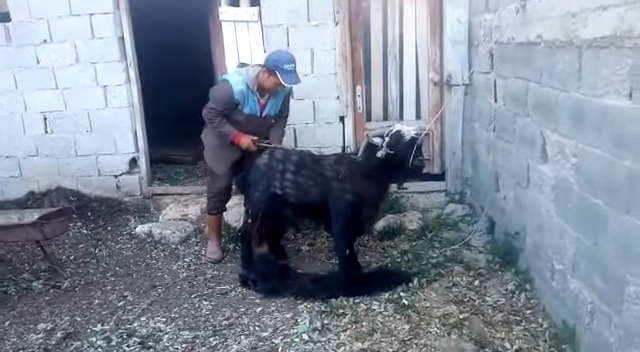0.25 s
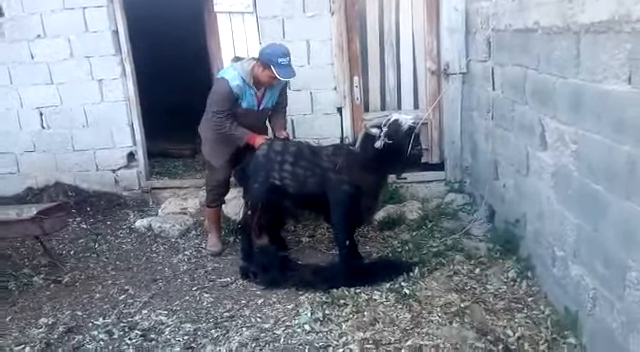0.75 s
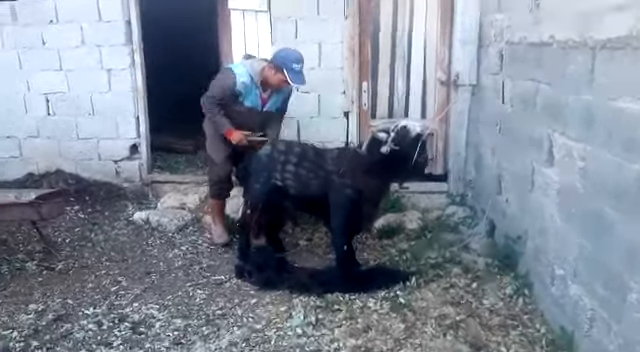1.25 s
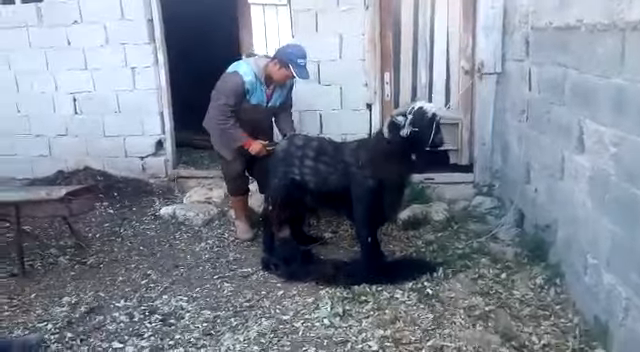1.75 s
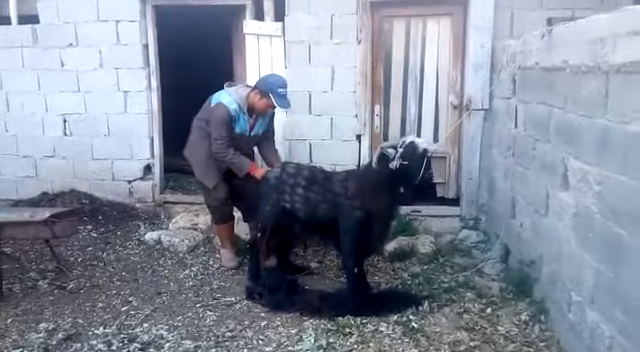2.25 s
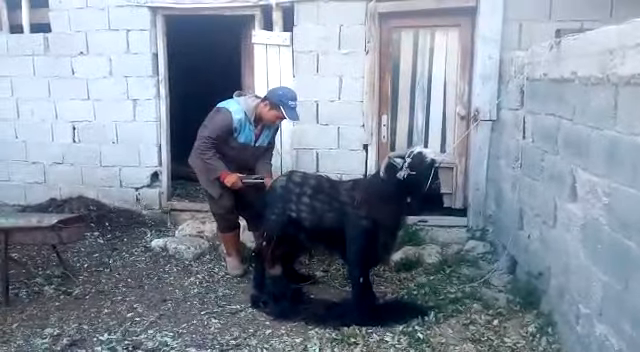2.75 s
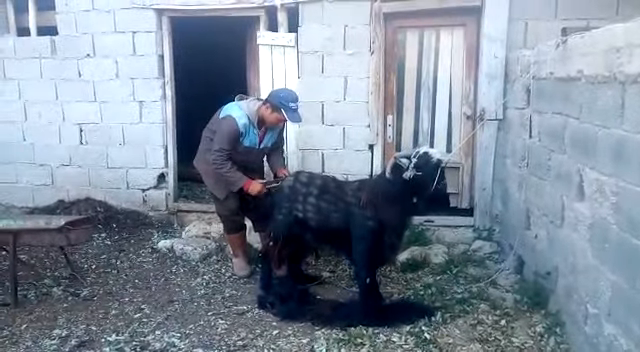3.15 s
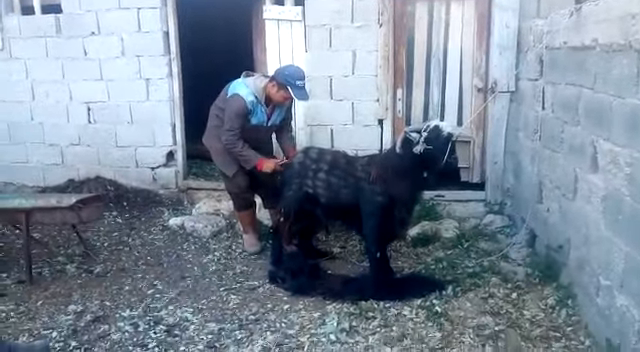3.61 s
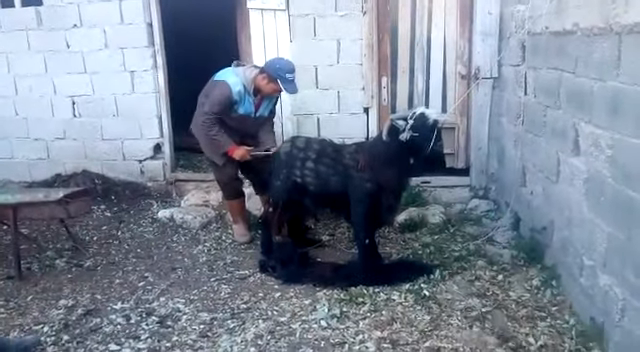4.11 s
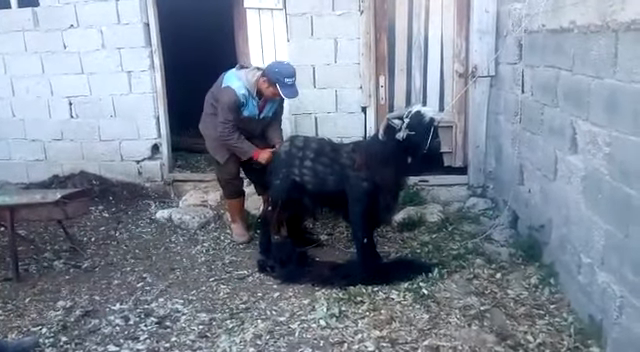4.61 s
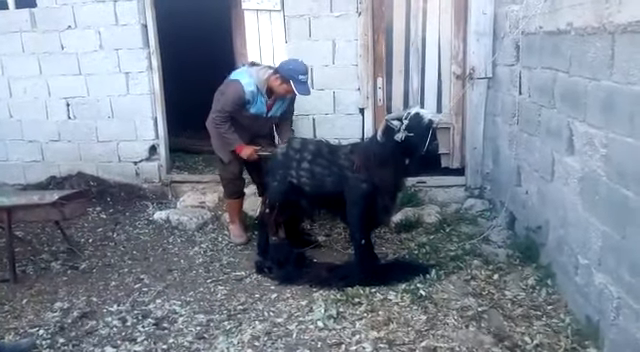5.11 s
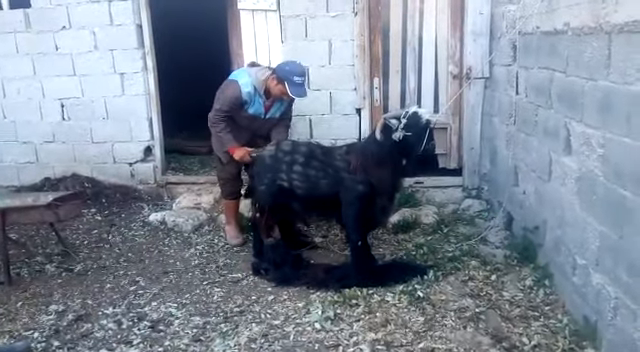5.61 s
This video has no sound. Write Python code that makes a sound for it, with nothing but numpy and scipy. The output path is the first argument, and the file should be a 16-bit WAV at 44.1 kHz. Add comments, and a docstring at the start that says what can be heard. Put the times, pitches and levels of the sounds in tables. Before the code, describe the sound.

Steel hand shears cut through a goat's long hair in four sharp snips, a little over a second apart. Each has a brief crunch, a bright metallic clack, then a soft ringing scrape as the blades spring open. Between them come faint coat rustles, a few dull hoof knocks and a soft boot scuff. The walled yard gives a short echo over a faint hum of air.

```python
"""Shearing a goat by hand

Steel shears make four snips through long hair in a quiet yard between block walls. Each time the
blades crunch through a tuft, clack against their stop, then slide open with a soft ring. The walls
send back a short echo. A hand rustles the coat, hooves and a boot shift, and the air hums faintly."""
import sys
import numpy as np
from scipy import signal
from scipy.fft import rfft, irfft, next_fast_len
from scipy.io import wavfile
from scipy.ndimage import uniform_filter1d

SR = 44100
rng = np.random.default_rng(int(sys.argv[2]) if len(sys.argv) > 2 else 0)


def materialize(psi):
    """Save the field psi as 16-bit PCM at rate SR to the path in sys.argv[1].

    A 1-D psi becomes a single channel; in a 2-D psi each row is a channel.
    """
    bounded = np.clip(np.atleast_2d(psi).T, -1, 1)
    quanta = np.round(bounded * 32767).astype(np.int16)
    wavfile.write(sys.argv[1], SR, quanta)


N = 258733
TIME = np.arange(N) / SR

# The blades hit their stop and bounce once; each snip rings louder or softer around one pitch (its band).
# start_s, level_db, band_hz, band_db, crack_tilt_db_per_octave, bounce_delay_s, bounce_db
SNIPS = [(1.0062, -14.5, 2810, 4.5, 0, 0.0056, -1.7), (2.2709, -13.5, 4200, -2.5, -0.5, .0054, -7),
         (3.5862, -13, 1500, 4.5, 0.2, 0.0066, -4.5), (4.8979, -16.5, 1550, 3.5, -0.5, .0054, -6.5)]


def clacks():
    """The blades hit their stop, bounce, and hit it again a few milliseconds later."""
    out = np.zeros(N)
    for start_s, level_db, band_hz, band_db, tilt_db, bounce_delay_s, bounce_db in SNIPS:
        add(out, start_s, from_db(level_db) * steel_hit(band_hz, band_db, tilt_db))
        # the steel is still shaking, so the second hit starts its tones out of step
        bounce = steel_hit(band_hz, band_db, tilt_db, scatter_turns=0.94)
        add(out, start_s + bounce_delay_s, from_db(level_db + bounce_db) * bounce)
    return out


def steel_hit(band_hz, band_db, tilt_db, scatter_turns=0.22, ring_db=6.0, crack_db=0.5,
              crack_fade_s=0.033, rise_s=0.00097):
    """Steel meets steel: a noisy crack, and many tones that each ring with their own strength."""
    # The tones the shears ring with: pitch_hz, level_db, fade_s
    shear_tones = [(540, -33, .04), (653, -24, 0.11), (1543, -11.5, 0.018), (1607, -19.5, 0.037),
                   (2034, -9, 0.028), (2242, -14, 0.056), (2463, -14, .028), (2550, -10, 0.024),
                   (2840, -6, 0.013), (4240, -10, 0.036), (4520, -5.5, 0.024), (4650, -16.5, .028),
                   (4950, -9.5, .03), (4900, -11.5, .04), (5440, -20, 0.038), (5790, -12.5, 0.03),
                   (5780, -10, .03), (6360, -8.5, 0.016), (6465, 0.5, 0.025), (6695, 4, 0.045),
                   (6826, 0, 0.025), (6750, -11.5, 0.019), (7230, -7.5, 0.042), (7360, -7.5, 0.036),
                   (11870, -22.5, 0.033)]
    # The colour of the crack: pitch_hz, level_db
    crack_colour = [(300, -38), (600, -4), (850, -26), (1500, -14.5), (1800, -18.5), (2700, .5),
                    (3600, -11.5), (4600, -6), (6000, -3.5), (6800, 7.5), (7900, -8), (10500, -18.5),
                    (15000, -16.5)]

    def band_change(hz):
        """Decibels added or taken away for pitches near band_hz."""
        return band_db * swell(np.log2(hz), np.log2(band_hz), half_width=.2)

    t = TIME[:SR // 6]
    pitch_hz, level_db, fade_s = np.transpose(shear_tones)[:, :, None]
    strength = from_db(level_db + band_change(pitch_hz) - rng.standard_normal(pitch_hz.shape))
    # tones close in pitch drift in and out of step, so the ring wavers
    turns = pitch_hz * t + scatter_turns * rng.standard_normal(pitch_hz.shape)
    tones = strength * dying(t, fade_s) * np.sin(2 * np.pi * turns)
    ring = tones.sum(axis=0) / np.linalg.norm(strength)
    # the tilt makes the crack brighter or duller, tipping its colour around 4000 Hz
    colour = [(hz, db + tilt_db * np.log2(hz / 4000) + band_change(hz)) for hz, db in crack_colour]
    crack = coloured(rng.standard_normal(len(t)), colour) * dying(t, crack_fade_s)
    return (from_db(ring_db) * ring + from_db(crack_db) * crack) * (1 - np.exp(-t / rise_s))


def hair_cuts(strand_s=.005, strand_db=1.5, blade_db=-3, wobble_hz=110, tip_hz=5563):
    """Hairs part in tiny snaps while edge drags on edge, squeaking at a pitch set by where they touch."""
    # The blades bite into a tuft: middle_s, half_length_s, level_db, squeak_hz, squeak_db
    bites = [(0.954, .008, -37.5, 5380, 9.5), (2.236, 0.0084, -55, 6500, -6),
             (3.551, .008, -39.5, 6310, 12), (4.815, 0.018, -48.5, 6380, -1)]
    # The colour of hair being cut: pitch_hz, level_db
    hair_colour = [(1000, -19.5), (3200, -11), (4500, -5), (5400, 0), (6700, 2), (8000, -9.5),
                   (9500, -15.5), (11000, -33.5), (15000, -19)]
    # the hair lies in strands, so the crunch comes in uneven bursts
    strands = rms_one(uniform_filter1d(rng.standard_normal(N), round(strand_s * SR)))
    snaps = grains(per_s=3300, spread_db=0.0) * from_db(strand_db * strands)
    crunch = rms_one(coloured(snaps, hair_colour) + from_db(blade_db) * blade_ring(snaps))
    # uneven rubbing makes the squeak's pitch wobble
    wobble = wobble_hz * rms_one(uniform_filter1d(rng.standard_normal(N), size=150))

    def rub(squeak_hz, squeak_db):
        """The crunch with a squeak mixed in."""
        squeak = np.sqrt(2) * np.sin(2 * np.pi * np.cumsum(squeak_hz + wobble) / SR)
        return rms_one(crunch + from_db(squeak_db) * squeak)

    out = sum(from_db(level_db) * swell(TIME, middle_s, half_s) * rub(squeak_hz, squeak_db)
              for middle_s, half_s, level_db, squeak_hz, squeak_db in bites)
    # before the first bite the blades are eased shut with a thin squeal
    easing = edge_drag(full_s=.77, level_db=-59) * (TIME < bites[0][0])
    out += easing * rub(squeak_hz=6100, squeak_db=0)
    for (bite_s, _, _, bite_hz, _), (stop_s, *_) in zip(bites, SNIPS):
        # the squeak glides as the touching point runs out to the tips
        glide_hz = np.interp(TIME, [bite_s, stop_s], [bite_hz, tip_hz])
        out += closing_stroke(bite_s, stop_s) * rub(glide_hz, squeak_db=-9)
    return out


def closing_stroke(bite_s, stop_s, drag_db=-47, rush_db=-43.5, rush_s=0.011):
    """Loudness of one stroke: the edges drag, then rush into the stop as the last hairs give way."""
    rush = from_db(rush_db) * swell(TIME, stop_s, rush_s)
    return (edge_drag(bite_s, drag_db) + rush) * (TIME < stop_s)


def edge_drag(full_s, level_db, rise_s=0.023):
    """Loudness of the rubbing edges: it builds until full_s, then holds."""
    return from_db(level_db) * swell(np.minimum(TIME, full_s), full_s, rise_s)


def blade_openings(rasp_db=-7, rise_s=0.0042, fade_s=0.075):
    """The spring jerks the blades apart: a brief chatter that sets them ringing."""
    # Each time the blades spring open: start_s, level_db, boost_hz
    openings = [(.110, -45, 4900), (1.156, -41, 6700), (2.413, -45.5, 6340), (3.736, -43.5, 4400),
                (5.073, -43.5, 2120)]
    # The colour of bare steel sliding: pitch_hz, level_db
    slide_colour = [(1000, -19), (2200, 8), (3000, 3.5), (3600, 6), (4500, -5), (6300, 5), (7500, -14),
                    (9800, -21), (11000, -34), (15000, -23)]
    chatter = grains(per_s=4200, spread_db=-1.5)
    rasp = from_db(rasp_db) * coloured(chatter, slide_colour)
    out = np.zeros(N)
    for start_s, level_db, boost_hz in openings:
        t = np.maximum(TIME - start_s, 0)
        push = from_db(level_db) * dying(t, fade_s) * (1 - np.exp(-t / rise_s))
        out += push * (blade_ring(chatter, boost_hz, boost_db=3.5) + rasp)
    return out


def blade_ring(chatter, boost_hz=4500, boost_db=0):
    """The blades ring along with whatever rubs them; tones near boost_hz can be made louder."""
    # The tones of the freely ringing blades: pitch_hz, width_hz, level_db
    blade_tones = [(2080, 160, -15.5), (2400, 53, -17), (3530, 49, -6), (4160, 62, -1.5), (4543, 71, 4.5),
                   (5344, 124.6, 5.5), (6220, 89, 6.5), (7200, 85, -5.5), (8500, 100, -21.5),
                   (9400, 80, -34.5), (9160, 90, -21.5)]
    ring = np.zeros(N)
    for pitch_hz, width_hz, level_db in blade_tones:
        extra_db = boost_db * swell(np.log2(pitch_hz), np.log2(boost_hz), half_width=0.12)
        ring += from_db(level_db + extra_db) * rms_one(resonance(chatter, pitch_hz, width_hz))
    return rms_one(ring)


def hoof_knocks(grit_db=-3.5, rise_s=0.00085):
    """Hooves and grit make small, dull knocks: each is a short tone with a little noise in it."""
    # The knocks: start_s, level_db, pitch_hz
    knocks = [(1.234, -43.5, 97), (1.266, -41.5, 126), (1.267, -38.5, 1100), (3.067, -45, 3130),
              (3.350, -43, 1630)]
    out, t = np.zeros(N), TIME[:SR // 4]
    for start_s, level_db, hz in knocks:
        noise = rng.standard_normal(len(t))
        grit = rms_one(resonance(resonance(noise, hz, hz), hz, hz))
        fade_s = 0.048 * np.sqrt(110 / hz)   # smaller things sound higher and die away sooner
        loudness = from_db(level_db) * dying(t, fade_s) * (1 - np.exp(-t / rise_s))
        add(out, start_s, loudness * (np.sin(2 * np.pi * hz * t) + from_db(grit_db) * grit))
    return out


def boot_scuff(middle_s=2.215, half_s=.022, level_db=-51):
    """A boot sole grinds softly over the dirt."""
    # The colour of the dirt: pitch_hz, level_db
    dirt_colour = [(80, -10), (180, 3.5), (450, -7), (1000, -15.5), (3000, -45)]
    grinding = coloured(grains(per_s=2300, spread_db=2.5), dirt_colour)
    return from_db(level_db) * swell(TIME, middle_s, half_s) * grinding


def coat_rustles():
    """The goat's coat rustles as a hand gathers the next tuft."""
    # Each touch of the hand: middle_s, half_length_s, level_db
    touches = [(1.456, 0.09, -66), (1.876, 0.18, -71), (4.071, 0.019, -56)]
    # The colour of the rustling coat: pitch_hz, level_db
    coat_colour = [(300, 4), (800, 1), (3500, -4), (7000, 0.5), (8500, -22), (15000, -20)]
    loudness = sum(from_db(db) * swell(TIME, middle_s, half_s) for middle_s, half_s, db in touches)
    return loudness * coloured(grains(per_s=3200, spread_db=4.5), coat_colour)


def yard_echo(sound, wall_s=.0113, wall_db=-15, scatter_db=-14, far_db=-29, tail_db=-27):
    """Add a bounce off the near wall, scatter from the blocks, a blurred far echo and a fading tail."""
    # The colours of near and far echoes: pitch_hz, level_db
    near_colour = [(300, -2), (2500, -1.7), (5000, 0.98), (7000, -2.3), (9000, 1.0), (15000, -3.0)]
    far_colour = [(300, 13.5), (2600, -0.5), (5000, 0.5), (6800, -4.0), (8500, -4.0), (15000, -17)]
    t = TIME[:SR // 2]
    scatter = coloured(rng.standard_normal(len(t)), near_colour) * dying(t, 0.13) * (t > wall_s / 2)
    far = coloured(rng.standard_normal(len(t)), far_colour) * swell(t, middle=0.08, half_width=0.018)
    tail = coloured(rng.standard_normal(len(t)), far_colour) * dying(t, 0.57) * (t > wall_s)
    echoes = np.zeros(len(t))
    echoes[0] = 1   # the sound that comes straight to the ear
    echoes[round(wall_s * SR)] = from_db(wall_db)
    for level_db, cloud in ((scatter_db, scatter), (far_db, far), (tail_db, tail)):
        echoes += from_db(level_db) * cloud / np.linalg.norm(cloud)
    return signal.fftconvolve(sound, echoes)[:N]


def still_air(level_db=-58):
    """The still air of the yard: a steady low hum and a faint hiss."""
    # The colour of the hum and hiss: pitch_hz, level_db
    air_colour = [(20, -25), (40, -6), (62, 1.5), (110, -0.5), (200, -4), (450, -9), (1200, -14),
                  (3500, -18.5), (6500, -20.5), (8000, -34), (14000, -37), (14700, -23), (15600, -27.5)]
    return from_db(level_db) * coloured(rng.standard_normal(N), air_colour)


def from_db(db):
    """Turn decibels into a number to multiply a sound by."""
    return 10 ** (np.asarray(db) / 20)


def rms_one(x):
    """Scale a signal so that its average size (root mean square) is 1."""
    return x / np.sqrt(np.mean(x ** 2) + 1e-20)


def coloured(noise, colour):
    """Give noise a colour (how strong it is at each pitch) and an average size of 1."""
    hz, db = np.transpose(colour)
    size = next_fast_len(len(noise))
    bins_hz = np.maximum(np.fft.rfftfreq(size, 1 / SR), 1)
    gain = from_db(np.interp(np.log(bins_hz), np.log(hz), db))
    return rms_one(irfft(rfft(noise, size) * gain, size)[:len(noise)])


def dying(t, fade_s):
    """A fade that loses 60 dB in fade_s seconds."""
    return np.exp(-np.log(1000) * t / fade_s)


def swell(x, middle, half_width):
    """A smooth, bell-shaped rise and fall."""
    return np.exp(-.5 * ((x - middle) / half_width) ** 2)


def add(track, start_s, sound):
    """Mix a sound into the track at start_s."""
    at = max(round(start_s * SR), 0)
    track[at:at + len(sound)] += sound[:N - at]


def grains(per_s, spread_db):
    """Tiny snaps at random times; spread_db sets how uneven their sizes are."""
    sizes = from_db(spread_db * np.minimum(rng.exponential(1, N), 4)) * rng.choice([-1, 1], N)
    return rms_one(sizes * (rng.random(N) < per_s / SR))


def resonance(sound, pitch_hz, width_hz):
    """A filter that rings at one pitch; the narrower it is, the longer it rings."""
    decay = np.exp(-np.pi * width_hz / SR)
    feedback = [1, -2 * decay * np.cos(2 * np.pi * pitch_hz / SR), decay * decay]
    return signal.lfilter([1, 0, -1], feedback, sound)


def scene():
    """Mix the shears and the coat with their echo, then add hooves, boot and air, in one channel."""
    shears = from_db(-0.5) * clacks() + from_db(-5.0) * hair_cuts() + from_db(1.5) * blade_openings()
    air = still_air()
    shearing = yard_echo(shears + from_db(2.0) * coat_rustles())
    return (shearing + hoof_knocks() + boot_scuff() + air)[None]


def record(dry, ceiling=0.78, cutoff_hz=15600):
    """Round off the loudest peaks and cut the very highest treble."""
    rounded = ceiling * np.tanh(dry / ceiling)
    low_pass = signal.ellip(12, .1, 80, cutoff_hz, fs=SR, output="sos")
    return signal.sosfilt(low_pass, rounded)


dry = scene()
out = record(dry)
materialize(out)
```